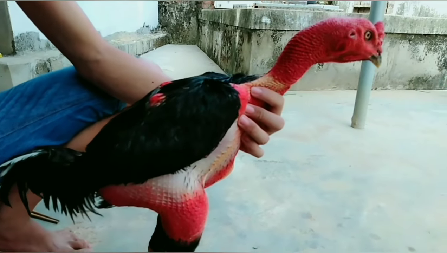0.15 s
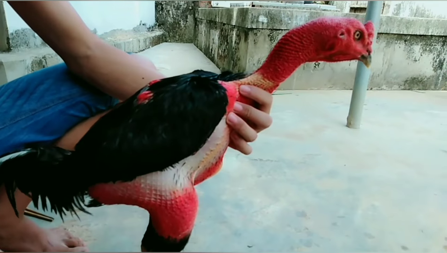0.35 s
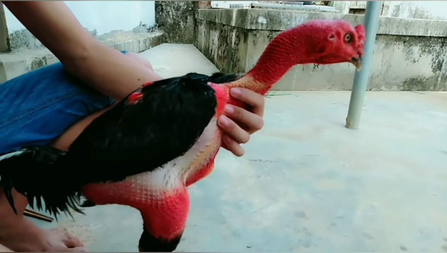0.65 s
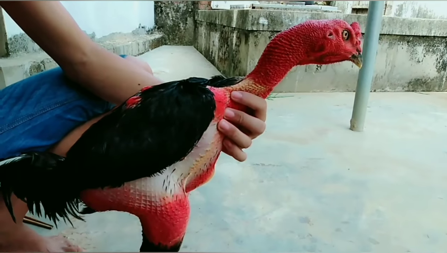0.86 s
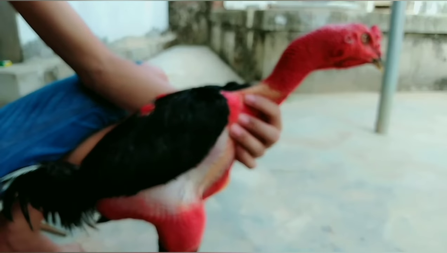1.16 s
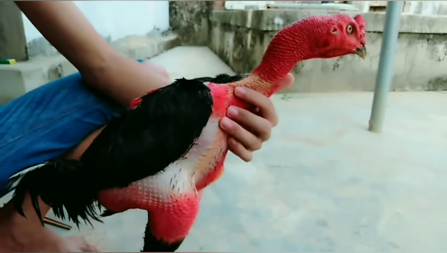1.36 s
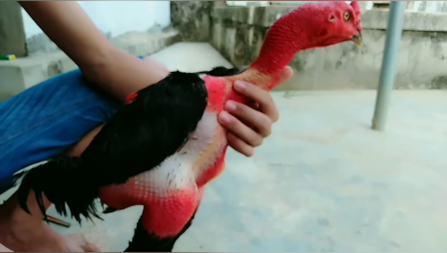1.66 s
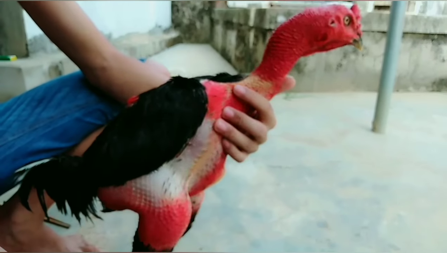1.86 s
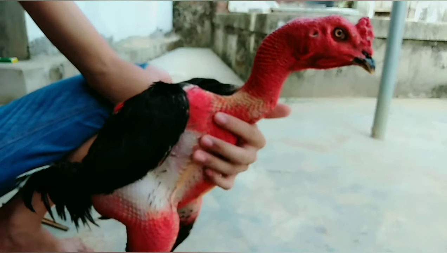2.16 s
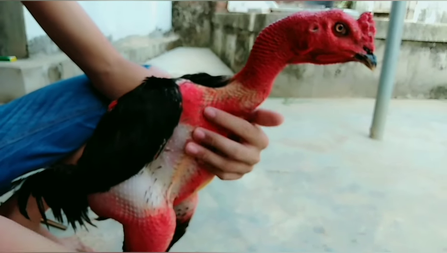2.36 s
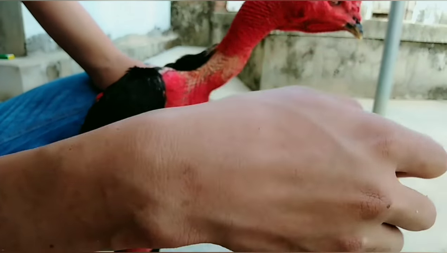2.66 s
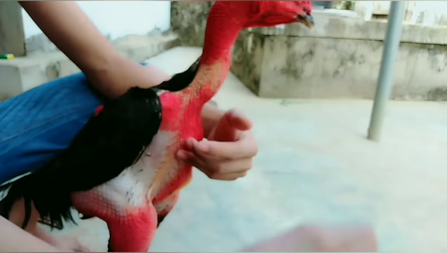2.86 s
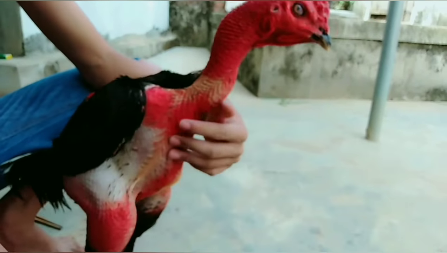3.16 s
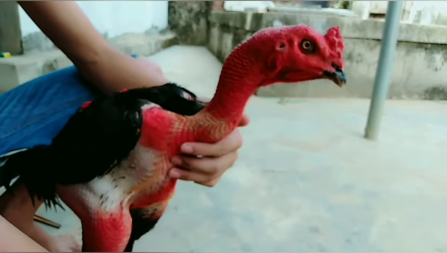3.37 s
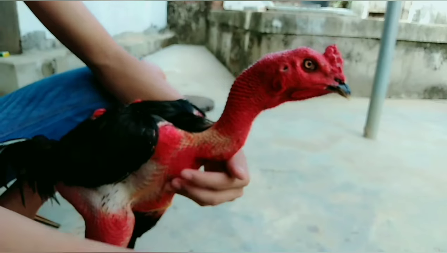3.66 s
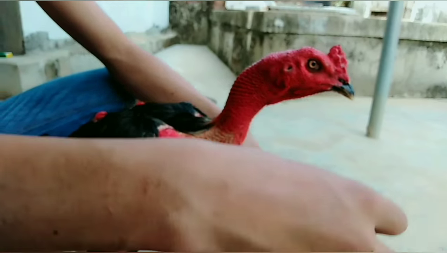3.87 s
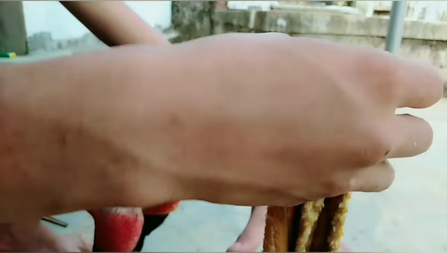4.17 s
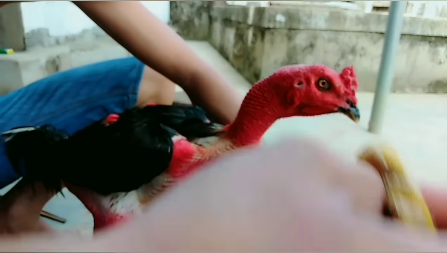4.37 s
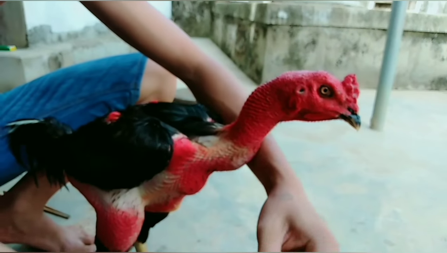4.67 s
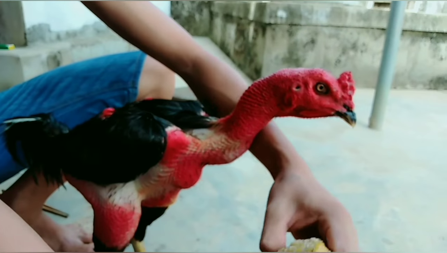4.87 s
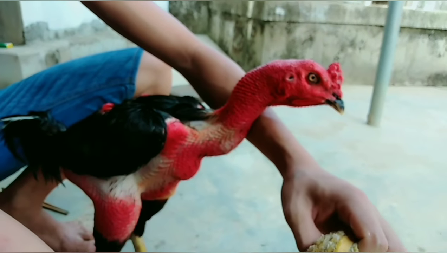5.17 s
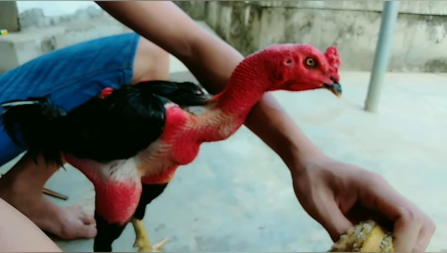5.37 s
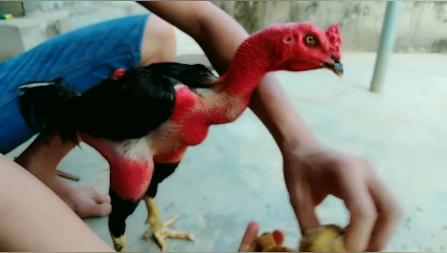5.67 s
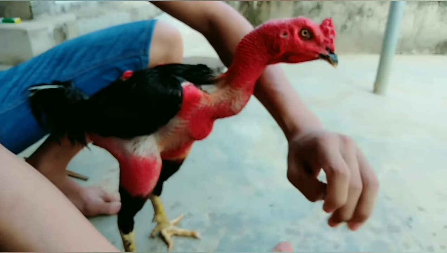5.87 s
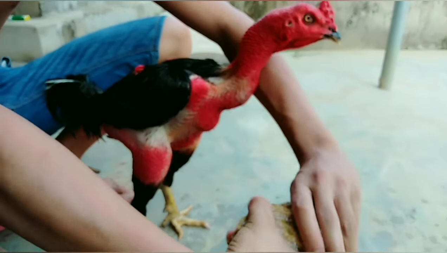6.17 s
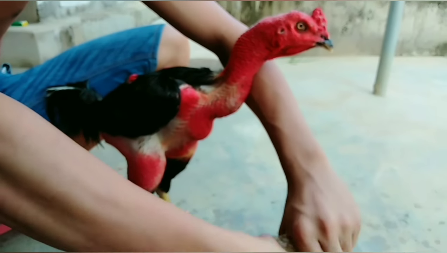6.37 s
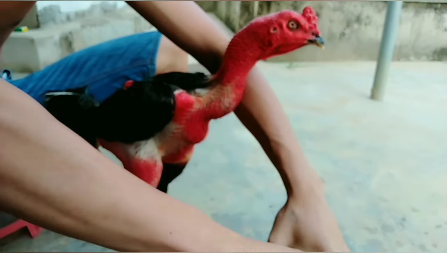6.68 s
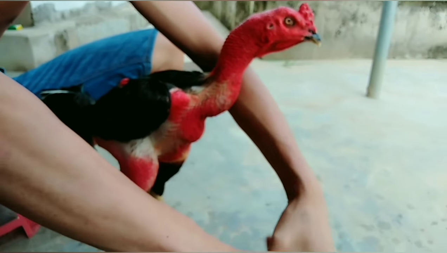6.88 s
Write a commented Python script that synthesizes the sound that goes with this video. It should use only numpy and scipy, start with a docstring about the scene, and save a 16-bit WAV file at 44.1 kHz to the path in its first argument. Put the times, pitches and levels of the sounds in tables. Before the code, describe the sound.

Close wet rubbing of a rooster's damp feathers, four hollow slapping pats, ticking drips and soft bumps, then a fizzy towel squelch in a quiet yard.

```python
"""A rooster is washed by hand in a walled yard, close to the microphone: seven seconds over quiet air.
First, fingers rub and squeeze damp feathers, a crackle of tiny bubbles, and water films snap and drip.
From 0.6 s a wet palm pats the body four times, each pat a run of air puffs that sweep up in pitch.
Around the last pat and soon after it, a fowl further off calls faintly: pulses through a throat tone.
The rubbing goes on with soft bumps; from 5.9 s a soaked towel is gathered and rolled with a fizzy squelch."""
import sys
import numpy as np
from scipy import signal
from scipy.fft import rfft, irfft, next_fast_len
from scipy.io import wavfile

SR = 44100
rng = np.random.default_rng(int(sys.argv[2]) if len(sys.argv) > 2 else 0)


def inscribe(sig):
    """Save sig as 16-bit PCM at rate SR to the path in sys.argv[1].

    A 1-D sig is mono; a 2-D sig holds one channel per row.
    Samples are clipped to [-1, 1] before scaling.
    """
    pcm = np.round(np.clip(np.atleast_2d(sig).T, -1, 1) * 32767)
    wavfile.write(sys.argv[1], SR, pcm.astype(np.int16))


N = 309141   # length in samples
TIME = np.arange(N) / SR
CUTOFF_HZ = 16000   # top of the sound


def from_db(db):
    """Turn decibels into a plain multiplier."""
    return 10 ** (np.asarray(db) / 20)


def rms_one(x):
    """Scale a sound to an average (RMS) level of 1."""
    return x / np.sqrt(np.mean(x ** 2) + 1e-20)


def colour(x, points):
    """Shape the tone through (Hz, dB) points, with a minimum-phase filter that never sounds early."""
    size = 2 * next_fast_len(N // 2 + SR // 4)
    hz, db = np.transpose(points)
    bin_hz = np.arange(size // 2 + 1) * SR / size
    gain_db = np.interp(np.log(bin_hz + 1), np.log(hz), db)
    # folding the cepstrum forward in time gives the minimum phase
    cepstrum = irfft(np.log(from_db(gain_db)))
    cepstrum[1:size // 2] *= 2
    cepstrum[size // 2 + 1:] = 0
    return irfft(rfft(x, size) * np.exp(rfft(cepstrum)))[:N]


def resonance(x, hz, width_hz):
    """Let one pitch ring: a band-pass with gain 1 at its peak."""
    r = np.exp(-np.pi * width_hz / SR)
    top = np.array([1, 0, -1]) * (1 - r * r) / 2
    bottom = [1, -2 * r * np.cos(2 * np.pi * hz / SR), r * r]
    return signal.lfilter(top, bottom, x + 1e-18)


def drift(corner_hz):
    """Smooth random wandering with an average (RMS) size of 1."""
    step = 40   # samples between the wandering points
    r = np.exp(-2 * np.pi * corner_hz * step / SR)
    chance = rng.standard_normal(N // step + 2002)
    slow = signal.lfilter([1], [1, -2 * r, r * r], chance)[2000:]   # skip the filter's start-up
    return np.interp(np.arange(N) / step, np.arange(len(slow)), rms_one(slow))


def swell(t, rise, fall):
    """Loudness shape: a bell-shaped rise to t = 0, then an exponential fall."""
    fading = np.where(t < 0, (t / rise) ** 2, t / fall)
    return np.exp(-np.minimum(fading, 40))


def grains(per_s, spread_db):
    """Random clicks, many small and few large."""
    sizes = from_db(spread_db * np.minimum(rng.exponential(1, N), 4))
    signs = rng.choice([-1, 1], N)
    return sizes * signs * (rng.random(N) < per_s / SR)


def add(out, s, sound):
    """Mix a short sound in at time s."""
    start = max(round(s * SR), 0)
    out[start:start + len(sound)] += sound[:N - start]


# tone of the quiet air: pitch_hz, level_db per Hz before overall scaling
AIR_TONE = [(12, 2), (20, 4.5), (49, 4.5), (285, -0.5), (347, 1), (590, -4), (1060, -6.5), (1260, -8),
            (2020, -8.5), (4670, -22), (5530, -59), (7310, -13), (10500, -22), (14700, -27), (16000, -2.5)]


def air(level_db=-60.5):
    """Still air in the yard: two separate soft noises, for the middle and for the sides."""
    return [from_db(level_db) * rms_one(colour(noise, AIR_TONE)) for noise in rng.standard_normal((2, N))]


def yard_reflections(x, t60=0.45, tail_db=-10.0, echo_s=0.022, echo_db=-19):
    """One wall echo and a diffuse fading tail, both with weak treble."""
    t = np.arange(SR * 2 // 3) / SR
    tail = rng.standard_normal(len(t)) * from_db(-60 * t / t60) * (1 - np.exp(-t / 0.0011))
    diffuse = from_db(tail_db) * signal.fftconvolve(x, tail / np.linalg.norm(tail))[:N]
    echo = from_db(echo_db) * np.interp(TIME - echo_s, TIME, x, left=0)
    tone = [(120, 4.5), (350, 5.5), (1000, 3.0), (1500, -2), (4000, -3.0), (15000, -12.0)]   # Hz, dB
    return colour(diffuse + echo, tone)


# pitches that ring between the yard walls: pitch_hz, level_db against the direct sound,
# fade_s (time to fall by 60 dB)
YARD_MODES = [(180, -9, 0.04), (231, 1.5, 0.59), (302, -1, 0.39), (380, -26, 0.85), (521, 3.5, 0.069),
              (686, 3, 0.42), (760, -3.5, 1), (849, -3.5, 1), (1016, -4, 0.55), (1092, -8.5, 0.049)]


def wall_ringing(near):
    """Sound caught between the walls rings on at a few low pitches."""
    return sum(from_db(db) * resonance(near, hz, np.log(1000) / (np.pi * fade_s))
               for hz, db, fade_s in YARD_MODES)


# faint reedy calls of a fowl further off: peak_s, level_db, pitch_hz, length_s (of the rise and of the fall)
FOWL_CALLS = [(1.293, -56.5, 381, 0.042), (1.653, -59, 377.5, .055)]


def fowl(throat_hz=1820, width_hz=1040, jitter=0.0036):
    """A steady pulse train, its pitch slightly jittered, sounds through one broad throat resonance."""
    out, t = np.zeros(N), np.arange(-SR // 5, SR // 5) / SR
    for s, db, hz, length in FOWL_CALLS:
        cycles = np.cumsum(hz * (1 + jitter * drift(40)[:len(t)])) / SR
        pulses = np.diff(np.floor(cycles), prepend=0)   # one click per finished cycle
        throat = resonance(resonance(pulses, throat_hz, width_hz), throat_hz, width_hz)
        add(out, s + t[0], from_db(db) * rms_one(throat) * swell(t, length, length))
    return out


# dull bumps and scuffs of handling: peak_s, level_db, pitch_hz, length_s (of the fall)
BUMPS = [(0.002, -54.5, 530, 0.051), (0.449, -35, 1230, 0.015), (.611, -29, 362, .008),
         (0.786, -41, 343, 0.024), (2.53, -60, 2640, 0.03), (1.651, -53.5, 320, .075),
         (1.654, -54.5, 1450, .05), (1.762, -56, 1070, 0.06), (2.919, -45.5, 197, 0.0081),
         (3.078, -48.5, 590, .037), (3.333, -51.5, 536, .044), (3.515, -45.5, 760, .004),
         (3.531, -36.5, 880, .0025), (3.62, -52, 473, .035), (3.641, -64.5, 73, 0.33),
         (3.75, -65, 3240, 0.1), (3.821, -59, 500, .055), (4.589, -58.5, 380, 0.018),
         (4.754, -50, 537, .003), (5.103, -62.5, 780, .1), (5.326, -62, 380, 0.032), (5.7, -57, 357, .04)]


def bumps(damping=0.63, rise_share=0.45):
    """Soft contacts stir one broad resonance each; the longer the contact, the slower it rises."""
    out, t = np.zeros(N), np.arange(SR) / SR
    for s, db, hz, length in BUMPS:
        noise = rng.standard_normal(len(t))
        body = resonance(resonance(noise, hz, damping * hz), hz, 2 * damping * hz)
        rise = rise_share * length
        lead = min(s, 2 * rise + 1 / 100)   # room for the rise before the peak
        shape = swell(t - lead, rise, length)
        add(out, s - lead, from_db(db) * rms_one(body * shape) * np.sqrt(np.mean(shape ** 2)))
    return out


# how hard the fingers rub skin and feathers: time_s, level_db (base level of the rubbing)
FINGER_EFFORT = [(0.0, -59), (0.53, -65.5), (0.8, -65.5), (1.09, -69.5), (1.39, -63.5), (1.82, -66.5),
                 (2.04, -65.5), (2.87, -69.5), (3.09, -53.5), (3.17, -57.5), (3.37, -66), (3.74, -63),
                 (4.07, -71), (4.93, -67.5), (5.19, -71), (5.6, -64)]
# the same for the towel, gathered up and then rolled on the ground: time_s, level_db
TOWEL_EFFORT = [(5.85, -57), (6.2, -58.5), (6.43, -53.5), (6.5, -47), (6.66, -47.5), (7.01, -48.5)]


def effort(s):
    """Effort of the rubbing at times s, and its swing about the mean of the table points, in dB."""
    times, db = np.transpose(FINGER_EFFORT + TOWEL_EFFORT)
    level = np.interp(s, times, db)
    return level, level - db.mean()


def small_drips(count=250, per_s=12, low_hz=1503, high_hz=3560):
    """Small films snap at random, oftener and louder as the rubbing gets harder; rows like DRIPS."""
    rate_follows, size_follows = 0.4, 0.89   # shares of the effort's swing
    when, luck, pitch = rng.random((count, 3)).T
    snap_db, bubble_db = rng.standard_normal((count, 2)).T   # 1 dB scatter from drip to drip
    s = when * N / SR
    _, swing = effort(s)
    hz = low_hz * (high_hz / low_hz) ** pitch
    size_db = size_follows * swing
    rows = np.transpose([s, -41.5 + size_db + snap_db, hz, -61 + size_db + bubble_db])
    # per_s is the rate at mean effort; luck decides which of the candidates sound
    chance = per_s * from_db(rate_follows * swing) * N / SR / count
    return list(rows[luck < chance])


# the loudest snapping water films: start_s, snap_db, bubble pitch_hz, bubble_db
# (drips() shifts both levels by a fixed amount; the pitch is where the bubble starts)
DRIPS = [(0.169, -42, 2240, -57), (0.4635, -26.5, 1330, -35.5), (.5157, -39, 3280, -44.5),
         (1.481, -38, 980, -49), (1.879, -36.5, 3390, -46), (2.1344, -33, 2070, -56),
         (2.2116, -39.5, 1550, -60), (2.9821, -33, 1740, -43), (3.044, -22.5, 2000, -60),
         (3.2496, -42.5, 1860, -39), (3.2984, -38, 1590, -59), (3.5662, -30, 2020, -44.5),
         (3.9435, -38, 1090, -51), (4.0277, -39, 1940, -58), (4.3318, -49, 2650, -52),
         (4.824, -41, 1820, -60), (4.865, -52, 2230, -50), (4.977, -49, 2800, -47),
         (4.9924, -58, 2090, -49), (5.253, -39.5, 1850, -68.5), (5.4371, -35, 3640, -53),
         (5.4672, -38.5, 3600, -55), (5.752, -38.5, 2650, -52), (5.854, -40, 1440, -43),
         (6.0227, -32.5, 2260, -45), (6.1567, -30.5, 3100, -54), (6.2504, -34, 4400, -48),
         (6.272, -27.5, 2250, -45), (6.34, -28.5, 2090, -46.5), (6.49, -29, 1560, -46.5),
         (6.6145, -33, 1860, -59), (6.776, -31, 2170, -56), (6.8115, -41, 2510, -40)]


def drips(snap_shift_db=-9, bubble_shift_db=3, snap_fall=0.0043, bubble_fall=0.0054, rise=0.00049,
          splash=0.16, glint_width_hz=900):
    """A film snaps with a bright tick of its own colour and leaves a short-lived bubble in a splash."""
    out, t = np.zeros(N), np.arange(SR // 25) / SR
    spray = rms_one(colour(rng.standard_normal(N), SPRAY_TONE))
    gurgle = rms_one(colour(rng.standard_normal(N), GURGLE_TONE))
    film_pitches = rng.uniform(4680, 9930, size=300)
    for (s, db, hz, bubble_db), film_hz in zip(DRIPS + small_drips(), film_pitches):
        here = (round(s * SR) + np.arange(len(t))) % N
        glint = rms_one(resonance(spray[here], film_hz, glint_width_hz))
        film = rms_one(spray[here] + glint)
        snap = from_db(db + snap_shift_db) * film * swell(t - rise, rise, snap_fall)
        rising_tone = np.sin(2 * np.pi * hz * t * (1 + 6 * t))
        wobble = rising_tone + 0.5 * rms_one(resonance(gurgle[here], hz, hz / 3))
        bubble = wobble / np.sqrt(1.5) + splash * gurgle[here]
        pop = from_db(bubble_db + bubble_shift_db) * bubble * swell(t - rise, rise, bubble_fall)
        add(out, s, snap + pop)
    return out


def bubbles(per_s, spread_db, low_hz, high_hz, life_s, count=28):
    """Tiny bubbles of many sizes swell and die quickly; life_s holds for a bubble at 2000 Hz."""
    clicks, dealt = grains(per_s, spread_db), rng.integers(0, count, N)
    pitches = np.geomspace(low_hz, min(high_hz, CUTOFF_HZ), count) * np.exp(rng.normal(0, 1 / 50, count))
    out = 0
    for k, hz in enumerate(pitches):
        width_hz = np.sqrt(hz / 2000) / (np.pi * life_s)   # small bubbles die sooner
        ringing = resonance(resonance(clicks * (dealt == k), hz, width_hz), hz, width_hz)
        out = out + rms_one(ringing)
    return rms_one(out)


# tone of water moving in cloth and feathers: pitch_hz, level_db per Hz before overall scaling
GURGLE_TONE = [(150, 2.5), (400, 2.5), (700, -2), (1200, -2.5), (1900, 5.5), (2700, -0.5), (3600, -3.5),
               (5000, -15.5), (8000, -30)]


def wet_texture(tone, per_s, fizz, clump_db):
    """Bright spray and lower gurgle of wet fibres; both come in clumps as the fibres stick and slip."""
    together = drift(90)   # clumping that both share
    spray = bubbles(per_s, 3.6, 3320, 15120, life_s=0.0011) + fizz * rng.standard_normal(N)
    gurgle = bubbles(per_s / 4, 0.72, 772, 5360, life_s=0.00094) + fizz * rng.standard_normal(N)
    layers = []
    for x, points in [(spray, tone), (gurgle, GURGLE_TONE)]:
        clumps = from_db(clump_db * (together + 0.5 * drift(88)))
        layers.append(rms_one(colour(x, points) * clumps))
    return layers


# tone of films squeezed under the hand: pitch_hz, level_db per Hz before overall scaling
SMACK_TONE = [(1760, -28), (3000, -10.5), (4930, -17), (5920, -10.5), (7100, 4), (7940, 0.5), (10700, -12),
              (12300, -2.5), (14800, 6), (16000, -3)]
# the hand sweeps over wet feathers or towel: peak_s, spray_db, length_s (of the fall), gurgle_db
STROKES = [(0.44, -39, 0.037, -42), (0.769, -50, 0.028, -53.5), (3.052, -42.5, 0.042, -45.5),
           (3.228, -64, 0.028, -52.5), (3.632, -56.5, .02, -58), (3.803, -52, 0.02, -51.5),
           (4.589, -40, 0.013, -51), (4.953, -61, 0.037, -59.5), (5.325, -59.5, .017, -74),
           (5.882, -41.5, 0.012, -49.5)]
# fingers press water out in a short squirt: peak_s, spray_db, gurgle_db
SQUEEZES = [(0.295, -39.5, -46.5), (0.412, -43, -44), (0.4525, -32.5, -32), (.58, -41.5, -47.5),
            (1.114, -34, -60), (1.401, -42.5, -44), (3.021, -47, -47), (3.1458, -44, -48),
            (3.616, -41, -45), (4.758, -42.5, -40), (5.903, -34.5, -41.5)]


def wipes():
    """Strokes, squeezes and pats each press out a denser burst of wet crackle."""
    spray, gurgle = wet_texture(SMACK_TONE, per_s=3500, fizz=0.8, clump_db=1.5)
    # each burst: peak s, spray dB, gurgle dB, rise s, fall s
    bursts = [(s, db, gurgle_db, 0.93 * length, length) for s, db, length, gurgle_db in STROKES]
    bursts += [(s, db, gurgle_db, 0.0022, 0.0042) for s, db, gurgle_db in SQUEEZES]
    # spray from a pat peaks 11 ms before the strongest puff; levels are against that puff
    bursts += [(s - 0.011, db - 29, db - 34, 0.011, 0.013) for s, db, *_ in PATS]
    return sum(swell(TIME - s, rise, fall) * (from_db(db) * spray + from_db(gurgle_db) * gurgle)
               for s, db, gurgle_db, rise, fall in bursts)


# tone of bursting water films: pitch_hz, level_db per Hz before overall scaling
SPRAY_TONE = [(1760, -32.5), (3000, -6), (3450, -12), (3750, -11), (4080, -9.5), (4500, -14.5), (6670, -4),
              (7200, 3), (9070, -13.5), (10900, -11), (12500, -8), (15100, 1.5), (16000, -7.5)]


def rubbing(glint=0.11, spray_db=0.5, cloth_db=-17, cloth_hz=583, cloth_width_hz=450):
    """Fingers, then towel, work wet fibres into spray, gurgle, film glints and a dull cloth drag."""
    gurgle_db, gurgle_follows = -63.5, 0.75   # level at mean effort; share of the effort's swing
    level, swing = effort(TIME)
    spray, gurgle = wet_texture(SPRAY_TONE, per_s=2600, fizz=1.05, clump_db=1.8)
    glints = rms_one(colour(bubbles(70, 4, 2800, 9000, life_s=0.0009), SPRAY_TONE))
    noise = rng.standard_normal(N)
    cloth = rms_one(resonance(resonance(noise, cloth_hz, cloth_width_hz), cloth_hz, 2 * cloth_width_hz))
    pressure = from_db(2.8 * drift(5.7))   # the pressure of the hand wavers
    bright = (spray + glint * glints) * from_db(level + spray_db)
    drag = cloth * from_db(level + cloth_db)
    return pressure * (bright + drag + gurgle * from_db(gurgle_db + gurgle_follows * swing))


# pats of the cupped wet palm: last_puff_s (the strongest puff), level_db, spacing_s (between the last
# two puffs), build_up in puffs, hollow_hz (steers the sweep; the pitch at the peak is a little higher)
PATS = [(0.629, -13.5, 0.0055, 1.73, 745), (0.9633, -16, 0.00407, 0.95, 745),
        (1.1284, -15.5, 0.00503, 1.46, 764), (1.3429, -15, 0.0054, 1.84, 754)]


def pats(glide_s=0.0016, swell_s=0.0023, ring_s=0.0016, low_hz=190, top_hz=1110,
         smack_db=-20, smack_hz=1780, smack_width_hz=1100, after_db=-13, after_s=0.0046):
    """Air under the palm escapes in growing puffs; each hollow shrinks, so its pitch sweeps upward."""
    out, t = np.zeros(N), np.arange(-SR // 100, SR // 50) / SR
    for s, db, spacing, build_up, hollow_hz in PATS:
        for k in range(4):   # k counts back from the last puff
            # earlier puffs leave a larger, lower hollow
            closing = np.exp(-2 * t / glide_s + 0.068 * k)
            hz = low_hz + (top_hz - low_hz) / (1 + (top_hz / hollow_hz - 1) * closing)
            phase = 2 * np.pi * np.cumsum(hz) / SR
            phase -= phase[np.argmin(np.abs(t))]
            puff = -np.cos(phase) * swell(t, swell_s, ring_s)
            if k == 0:   # the last, smallest hollow rings on
                puff += from_db(after_db) * np.sin(phase) * swell(t - after_s, swell_s, ring_s)
            # the wet skin smacks as it meets
            noise = rng.standard_normal(len(t))
            smack = resonance(resonance(noise, smack_hz, smack_width_hz), smack_hz, smack_width_hz)
            puff += from_db(smack_db) * rms_one(smack) * swell(t, swell_s, ring_s)
            strength = from_db(db) * np.exp(-(k / build_up) ** 1.5)
            add(out, s - k ** 0.92 * spacing + t[0], strength * puff)
    return signal.sosfilt(signal.butter(2, 3200, fs=SR, output="sos"), out)   # soften above 3200 Hz


# tone of the difference between the ports: pitch_hz, level_db before the hand position scales it
WIDTH = [(30, -13), (250, -66), (1000, -57), (2800, -57), (4800, 7.5), (7500, -16.5), (10000, 6),
         (15000, -10)]
# how far the hands work to one side of the microphone: time_s, level_db added to the port difference
OFF_AXIS = [(0, -10.5), (2.8, -7), (4.6, -10.5), (5.5, -7), (6.0, -17), (7.01, -62)]


def two_ports(sound, air_side, sway=0.33):
    """Sound scatters differently into two microphone ports, and changes as the hands move."""
    t = np.arange(SR // 100) / SR
    scatter = rng.standard_normal(len(t)) * np.exp(-t / 0.003)
    scattered = signal.fftconvolve(sound, scatter / np.linalg.norm(scatter))[:N]
    position = from_db(np.interp(TIME, *np.transpose(OFF_AXIS)))
    aside = position * (1 + sway * drift(37)) / np.hypot(1, sway)
    side = colour(scattered, WIDTH) * aside + from_db(-39) * air_side
    return np.array([sound + side, sound - side])


def scene():
    """Near handling and a far fowl sound in the yard, over still air, and reach two microphone ports."""
    air_middle, air_side = air()
    near = fowl() + bumps() + drips() + wipes() + rubbing() + pats()
    sound = near + yard_reflections(near) + wall_ringing(near) + air_middle
    return two_ports(sound, air_side)


def record(dry):
    """The top is cut steeply above the cutoff pitch."""
    return signal.sosfilt(signal.ellip(12, 0.2, 75, CUTOFF_HZ, fs=SR, output="sos"), dry)


dry = scene()
out = record(dry)
inscribe(out)
```